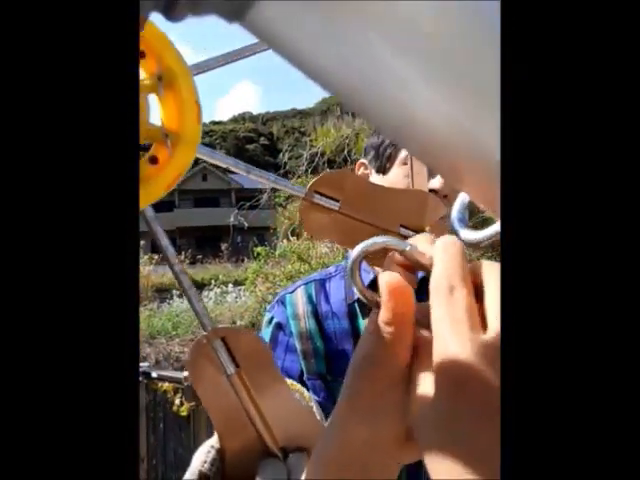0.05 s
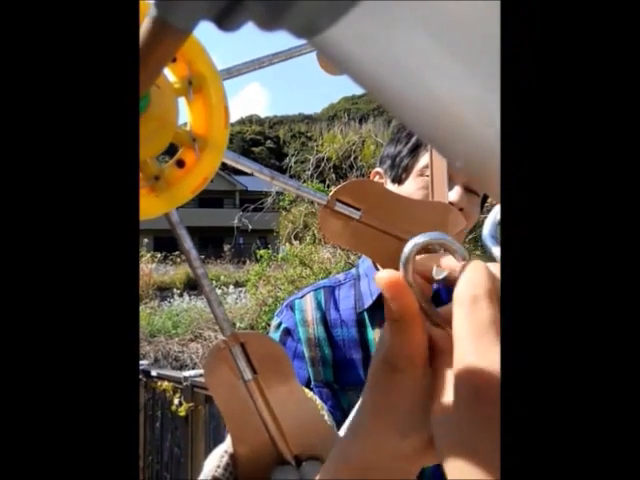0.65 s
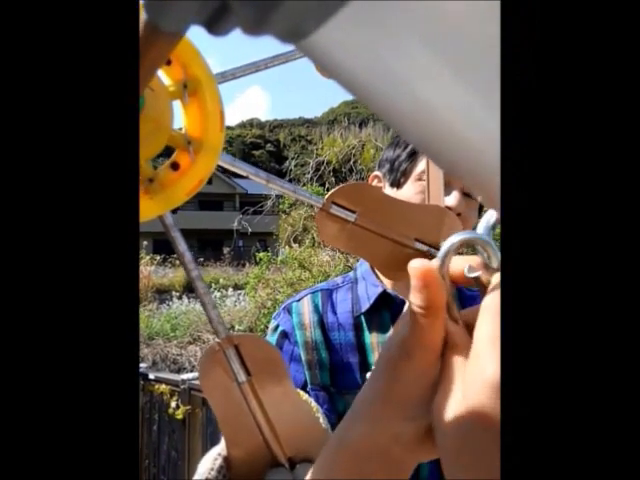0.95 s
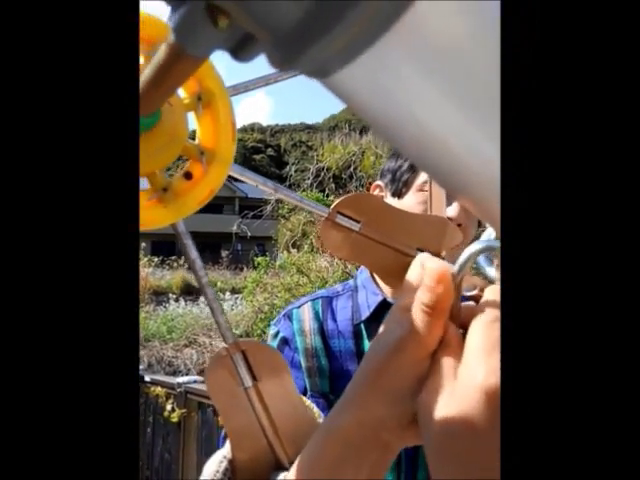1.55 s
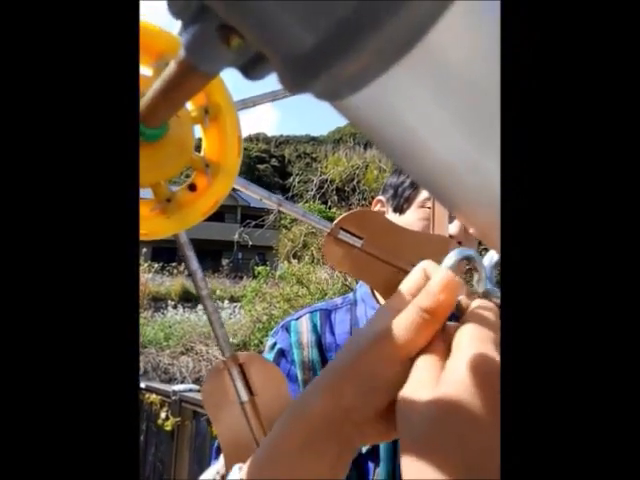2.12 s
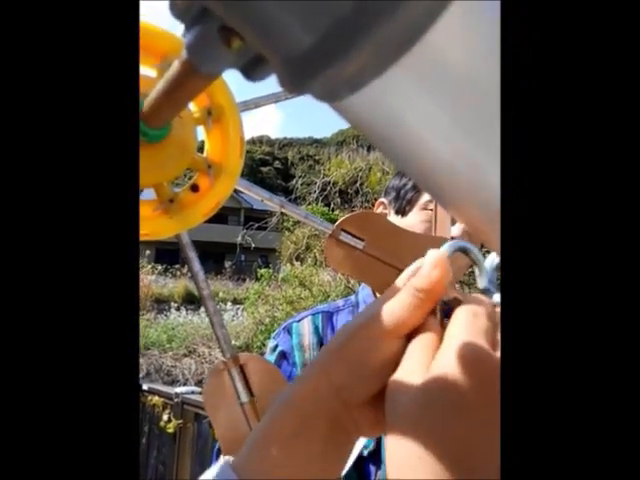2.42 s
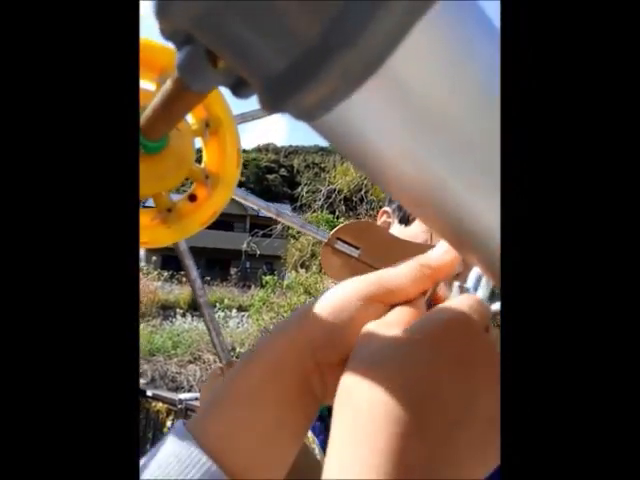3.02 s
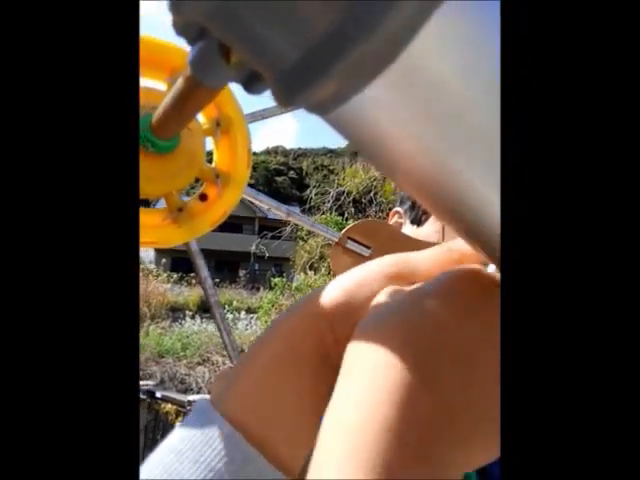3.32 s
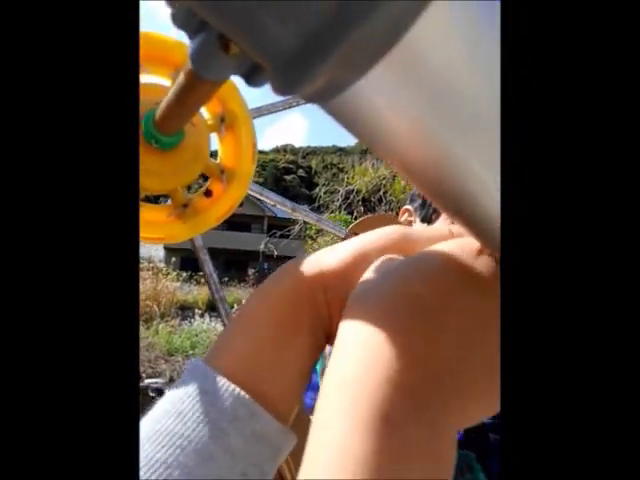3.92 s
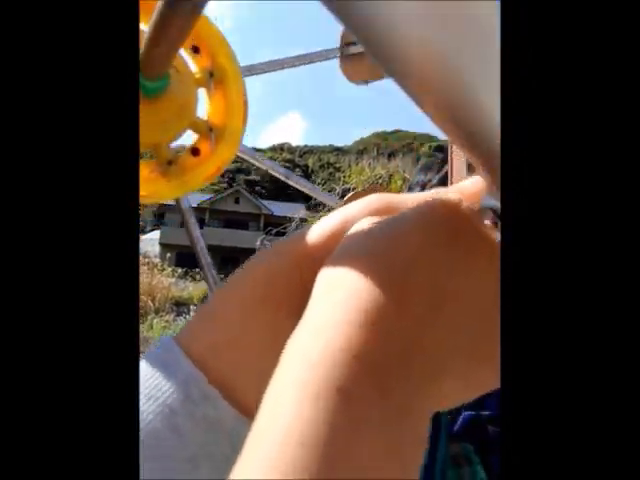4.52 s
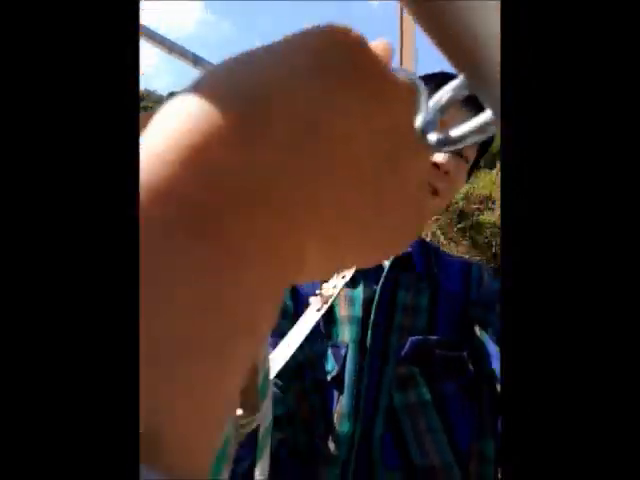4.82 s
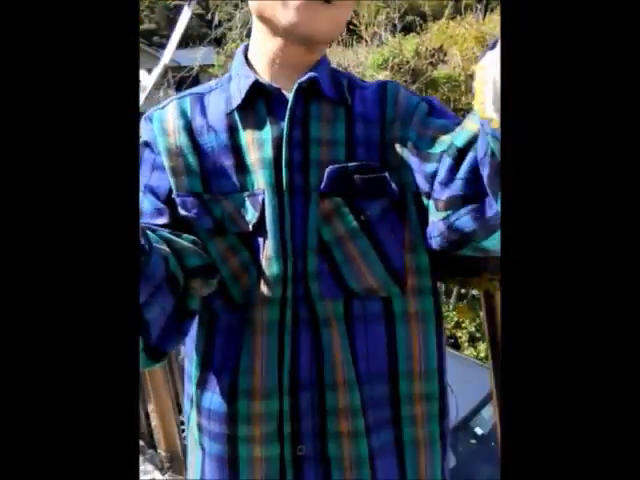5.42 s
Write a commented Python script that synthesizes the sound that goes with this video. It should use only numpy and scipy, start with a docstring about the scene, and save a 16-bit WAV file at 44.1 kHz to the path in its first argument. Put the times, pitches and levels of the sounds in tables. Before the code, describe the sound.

Outdoors and close to the microphone, a steel ring is worked into a fitting on a pole. It snaps three times, about two seconds apart, each a sharp, bright click with a very short ring. Between the snaps come faint ticks, thin squeaks, small scrapes and rustling sleeves. A soft low rumble of open air and a barely audible distant engine hum lie behind.

```python
"""A steel ring snapping into a fitting

Outdoors and close by, a steel ring is worked into a fitting on a pole. Stick-slip friction makes
it scrape and squeak under the fingers; three times it snaps home, and each impact excites the modes
of ring and fitting. Sleeves rustle, and the surroundings scatter a faint tail from the steel.
Behind it lie a low rumble of open air and the harmonic hum of a distant engine."""
import sys
import numpy as np
from scipy import signal
from scipy.io import wavfile

SR = 44100
rng = np.random.default_rng(int(sys.argv[2]) if len(sys.argv) > 2 else 0)


def wav_out(sig):
    """Save sig, one row per channel (or a flat mono array), as 16-bit PCM at SR to the path in sys.argv[1]."""
    wavfile.write(sys.argv[1], SR, np.round(np.clip(np.atleast_2d(sig).T, -1, 1) * 32767).astype(np.int16))


N = 249782
TIME = np.arange(N) / SR

# modes of the ring, the lowest from the pole it bears on: frequency_hz, level_db, t60_s
RING_MODES = [(660, -39, .2), (775, -36, .17), (835, -38, .2), (930, -36, .17), (1734, -34, .24),
              (2080, -25, .05), (3158, -16, .08), (3562, -29, .085), (3960, -25, .05), (4595, -15, .03),
              (4865, -13, .03), (5203, -18, .048), (5330, -22, .024), (6345, -20, .05), (6608, -7, .04),
              (6722, -24, .17), (6935, -13, .035), (7120, -16, .045), (7296, -3, .032), (7310, -24, .2),
              (7418, -30, .24), (8020, -21, .022), (8260, -20, .04), (8895, -11, .05), (9325, -13, .025)]
# modes of the fitting: frequency_hz, level_db, t60_s
FITTING_MODES = [(1610, -12, .03), (2257, -16, .037), (2775, -14, .025), (3100, -18, .045),
                 (3490, -15, .027), (4100, -10, .025), (4690, -9, .032), (5075, -12, .022),
                 (5750, -10, .075), (6180, -3, .02), (6530, -6, .036), (6990, 1, .03), (7300, -2, .024),
                 (7585, -7, .04), (8230, -8, .026), (8640, -14, .028), (9225, -15, .032)]

BAND_EDGES_HZ = np.r_[np.geomspace(10, 1500, 14), np.geomspace(1800, 17000, 18)]
BAND_HZ = np.sqrt(BAND_EDGES_HZ[:-1] * BAND_EDGES_HZ[1:])
BANDS = [signal.butter(2, edges, "band", fs=SR, output="sos")
         for edges in zip(BAND_EDGES_HZ, BAND_EDGES_HZ[1:])]


def from_db(db):
    """Amplitude grows tenfold for every 20 dB."""
    return 10 ** (np.asarray(db) / 20)


def rms_one(x):
    """Normalisation to unit mean power."""
    return x / np.sqrt(np.mean(x ** 2) + 1e-20)


def band_gains(spectrum):
    """Interpolation in log frequency gives a spectrum's gain at each band centre."""
    hz, db = np.transpose(spectrum)
    return from_db(np.interp(np.log(BAND_HZ), np.log(hz), db))


def drift(rate_hz):
    """Random modulation: straight lines join Gaussian values drawn at the given rate."""
    knots = rng.standard_normal(4096)
    return np.interp(TIME * rate_hz, np.arange(len(knots)), knots)


def coloured(spectrum, flicker_db=0, steady_hz=1500):
    """Spectral shaping: noise bands sum to unit rms; any flicker is deepest in the lows."""
    white = rng.standard_normal((2, N))
    depth_db = flicker_db / (1 + BAND_HZ / steady_hz)
    bands = (gain * signal.sosfilt(BANDS[k], white[k % 2]) * from_db(depth_db[k] * drift(12))
             for k, gain in enumerate(band_gains(spectrum)))
    return rms_one(sum(bands))


def stroke(peak_s, db, rise_s, fall_s, drop_db=14.5, roundness=1.53):
    """Amplitude envelope of a hand stroke, drop_db down at one rise or fall time from its peak."""
    distance = np.maximum((peak_s - TIME) / rise_s, (TIME - peak_s) / fall_s)
    return from_db(db - drop_db * np.minimum(distance, 10) ** roundness)


def strokes(rows):
    """Incoherent addition: the powers of the strokes sum."""
    return np.sqrt(sum(stroke(*row) ** 2 for row in rows))


def resonate(force, modes):
    """Modal superposition: each mode answers the force as a damped oscillator."""
    out = 0
    for k, (hz, db, t60_s) in enumerate(modes):
        radius = np.exp(-np.log(1000) / (t60_s * SR))
        angle = 2 * np.pi * hz / SR
        poles = [1, -2 * radius * np.cos(angle), radius * radius]
        out += (-1) ** k * from_db(db) * signal.lfilter([0, np.sin(angle)], poles, force + 1e-18)
    return out


def scrape(pushes, modes, slips_per_s, grit_db, tilt_db_per_octave, uneven_db=3, stick_db=-77):
    """Friction excitation: tiny uneven slips ring the modes and add a dry grit."""
    # grit of sliding steel: frequency_hz, density_db
    grit_spectrum = [(400, -14), (800, -2), (1300, -34), (2150, 2.5), (2700, -13), (3500, 2.5), (4300, -14),
                     (6000, -7), (7200, -8), (9100, -4), (10300, -25), (15000, -24)]
    level = np.maximum(strokes(pushes) - from_db(stick_db), 0)  # too light a push sticks, silent
    grip = from_db(uneven_db * drift(220))
    slips = (rng.random(N) < slips_per_s / SR) * rng.choice([-1, 1], N) * grip
    # rubbing is softer than a blow, so it favours the low modes
    top_hz = modes[-1][0]
    softened = [(hz, db + tilt_db_per_octave * np.log2(top_hz / max(hz, 2000)), t60_s)
                for hz, db, t60_s in modes]
    grit = from_db(grit_db) * coloured(grit_spectrum) * grip
    return level * (rms_one(resonate(slips, softened)) + grit)


def open_air(level_db=-53.5):
    """Ambient noise: open air rumbles with a spectrum weighted to the flickering lows."""
    # rumble of the air: frequency_hz, density_db
    spectrum = [(10, 2.5), (25, -1), (60, -3.5), (90, -6.5), (130, -14), (200, -15.5), (400, -23),
                (800, -27.5), (1500, -32), (3000, -34.5), (5500, -37), (7200, -32.5), (11000, -36),
                (15500, -39)]
    return from_db(level_db) * coloured(spectrum, flicker_db=2.5)


def distant_engine(fundamental_hz=67.56, waver=0.0031, swell_db=11.5, flutter_db=1):
    """Harmonic series: three orders of the far engine carry, each swelling in its own time."""
    # engine orders: order, peak_db, peak_s, half_length_s
    orders = [(3, -69.5, 1.3, 2.2), (4, -67.5, 2.7, 1.84), (5, -71, 1.05, 2.7)]
    cycles = np.cumsum(fundamental_hz * (1 + waver * drift(3.01))) / SR
    out = 0
    for order, peak_db, peak_s, half_length_s in orders:
        sunk_db = swell_db * (1 - np.exp(-((TIME - peak_s) / half_length_s) ** 2))
        level = from_db(peak_db - sunk_db + flutter_db * drift(5))
        out += level * np.sqrt(2) * np.sin(2 * np.pi * round(order) * cycles)
    return out


def scattering(sound, wet_db=-24, t60_s=0.2, build_s=0.014):
    """Diffuse reflection: pole, deck and bodies return a short, faint tail."""
    # scattered sound: frequency_hz, density_db
    spectrum = [(250, -4), (750, 8), (1200, 2), (1750, 5), (2300, -5), (3200, -9), (4800, -12), (5700, -7),
                (6900, -1), (9000, -6), (11000, -22), (15000, -26)]
    t = TIME[:SR // 2]
    envelope = np.exp(-np.log(1000) * t / t60_s) * (1 - np.exp(-t / build_s))
    response = coloured(spectrum)[:len(t)] * envelope
    return from_db(wet_db) * signal.fftconvolve(sound, response / np.linalg.norm(response))[:N]


def sleeves(rest_db=-75.5):
    """Friction noise: brushing cloth hisses with each stroke and is never quite still."""
    # brushes of the sleeves: peak_s, level_db, rise_s, fall_s
    brushes = [(1.66, -65.5, .18, .2), (2.9, -67, .25, .4), (3.19, -58, 0.21, 0.16),
               (3.42, -63.5, 0.11, .2), (3.62, -58.5, 0.12, .13), (4.2, -68, .15, 0.11),
               (4.56, -65.5, 0.3, 0.35), (5.16, -56.5, 0.24, 0.11), (5.315, -52.5, 0.065, 0.071),
               (5.58, -55.5, 0.24, 0.25)]
    # rustle of cloth: frequency_hz, density_db
    spectrum = [(500, 0.5), (1200, -6), (2300, -11), (4000, -6), (5500, -2), (7000, 5), (8300, 1.5),
                (10500, -23), (15000, -25)]
    level = np.hypot(strokes(brushes), from_db(rest_db))
    return level * from_db(drift(60)) * coloured(spectrum)


def grip_chafe():
    """Heavy damping: the grip's dense slips drive short-lived modes, soft and hollow."""
    # pushes of the grip: peak_s, level_db, rise_s, fall_s
    pushes = [(2.79, -64.5, .08, 0.073), (3.2, -63.5, .06, .08), (3.315, -59, 0.085, 0.084),
              (3.61, -63, 0.14, 0.13), (5.44, -62.5, 0.06, .06)]
    # hollow resonances: frequency_hz, level_db, t60_s
    modes = [(545, -5, .02), (2010, -4.5, 0.019), (2240, -2.5, .014)]
    return scrape(pushes, modes, slips_per_s=3300, grit_db=-23, tilt_db_per_octave=6)


def ring_drag():
    """Sliding friction excites the ring's modes as it is dragged through the fitting."""
    # drags of the ring: peak_s, level_db, rise_s, fall_s
    pushes = [(1.68, -66, 0.31, 0.28), (2.04, -51, 0.049, 0.095), (2.105, -60, .025, .03)]
    return scrape(pushes, RING_MODES, slips_per_s=1200, grit_db=-1.5, tilt_db_per_octave=4)


def fitting_rub():
    """Sliding friction excites the fitting's modes as the ring turns against it."""
    # turns of the ring: peak_s, level_db, rise_s, fall_s
    pushes = [(3.61, -57, 0.062, .1), (5.088, -48, .018, .022), (5.135, -43.5, 0.042, 0.026)]
    return scrape(pushes, FITTING_MODES, slips_per_s=1300, grit_db=-7.5, tilt_db_per_octave=4.5)


def ring_squeal():
    """Resonance: the slipping ring sings in a few modes."""
    # push on the ring: peak_s, level_db, rise_s, fall_s
    pushes = [(5.07, -48.5, 0.12, 0.074)]
    # singing resonances: frequency_hz, level_db, t60_s
    modes = [(2210, -15.5, 0.054), (4600, -6, 0.012), (6370, -5, 0.018), (6970, -1, 0.025),
             (7350, -7, 0.02)]
    return scrape(pushes, modes, slips_per_s=630, grit_db=-16, tilt_db_per_octave=1)


def squeaks(waver_hz=95, flutter_db=4, sag_octaves_per_s2=15):
    """Stick-slip oscillation sings a thin, raspy tone whose pitch arches with the stroke."""
    # slips of steel: peak_s, level_db, rise_s, fall_s, pitch_hz, glide_octaves_per_s
    slips = [(1.6, -71, .15, .09, 6150, 0.5), (1.665, -63.5, 0.041, 0.032, 8470, 0),
             (1.675, -74, 0.045, .045, 6900, -3), (1.665, -70, 0.054, .05, 4730, -2),
             (1.72, -73, .06, 0.16, 2980, 0.5), (1.985, -63.5, .03, 0.046, 5950, -7),
             (2.07, -65, 0.087, 0.038, 5585, 1), (3.63, -62.5, .08, 0.1, 9130, -0.5),
             (4.31, -59.5, 0.011, 0.018, 2380, 4.5), (5.2, -65.5, .04, 0.1, 2490, -1)]
    wavering_hz = waver_hz * drift(700)
    out = np.zeros(N)
    for peak_s, db, rise_s, fall_s, pitch_hz, glide in slips:
        t = TIME - peak_s
        hz = pitch_hz * 2 ** (glide * t - sag_octaves_per_s2 * t ** 2)
        phase = 2 * np.pi * np.cumsum(hz + wavering_hz) / SR
        out += stroke(peak_s, db, rise_s, fall_s) * np.sqrt(2) * np.sin(phase)
    return out * from_db(flutter_db * drift(120))


def rattle(count, size, rate_hz=60):
    """Narrowband modulation: complex noise of unit spread wobbles each mode's level and phase."""
    white = rng.standard_normal((count, size + SR // 10, 2)) @ [1, 1j]
    slow = signal.lfilter(*signal.butter(2, rate_hz, fs=SR), white)[:, -size:]
    return slow / np.std(slow)


def ringing(modes, driven_s, rise_s=0.00078, loose_s=0.053):
    """Forced, then free vibration: chatter sustains the modes, which fade unevenly as parts settle."""
    t = TIME[:SR // 3]
    hz, db, t60_s = np.transpose(modes)[:, :, None]
    attack = (1 - np.exp(-t / rise_s)) ** 2
    level = from_db(db - 60 * np.maximum(t - driven_s, 0) / t60_s)
    pure = np.exp(-(t / loose_s) ** 2)
    wobble = pure + np.sqrt(1 - pure ** 2) * rattle(len(modes), len(t))
    phase = 2 * np.pi * (hz * t + rng.random(hz.shape))
    tones = np.imag(wobble * np.exp(1j * phase))
    return attack * np.sum(level * tones, axis=0)


def crack(contact_s, lows_db, mids_db, fade_s=0.0029, linger_db=-29, linger_s=0.048, size=6144):
    """Modal overlap: chattering steel's dense, hand-damped modes merge in a burst with a faint tail."""
    # crack of a contact: frequency_hz, density_db
    spectrum = [(300, -31), (750, -24), (1300, -26), (2000, -18.5), (2700, -16.5), (3700, -9), (4800, 0.5),
                (5800, -16), (7000, 8), (9000, -5), (10500, -43), (14500, -24)]
    t = np.arange(size) / SR
    chatter = np.exp(-np.maximum(t - contact_s, 0) / fade_s)
    envelope = chatter + from_db(linger_db) * np.exp(-t / linger_s)
    gains = band_gains(spectrum) * np.sqrt(np.diff(BAND_EDGES_HZ))  # power grows with bandwidth
    colour = from_db(np.interp(BAND_HZ, [2510, 3560, 4940, 5950], [lows_db, mids_db, mids_db, 0]))
    weights = colour * gains / np.linalg.norm(gains)
    bands = [rms_one(signal.sosfilt(sos, envelope * rng.standard_normal(size))) for sos in BANDS]
    return weights @ np.array(bands) * np.sqrt(np.mean(envelope ** 2))


def clicks(crack_db=-3, modes_db=-3, driven_share=0.96):
    """Impact excitation: each contact cracks and sets ring and fitting vibrating."""
    # steel on steel, three loud snaps among light ticks, levels relative:
    # start_s, level_db, contact_s, lows_db, mids_db, ring_db, fitting_db
    contacts = [(0.548, -61, 0.0025, 25.5, 4, -15, -3), (0.621, -62, .002, 6, 14, -15, -11),
                (1.0355, -18, 0.0042, 6, 1.5, 6.5, -10), (2.023, -44.5, 0.0033, -5, -3, -4, -14),
                (2.034, -43.5, .0031, 6, 3, 2, -17), (2.414, -61.5, .0017, 2, 10, -15, -12),
                (2.525, -61, 0.0038, 35.5, 8, -7, -12), (3.0715, -24.5, 0.0013, 14.5, 8.5, 4, -5),
                (5.132, -43.5, .010, 11, 9.5, -20, -7), (5.158, -39.5, 0.003, 11, -4, -15, -10),
                (5.2685, -23, 0.0019, -4, 0, -8, -1), (5.356, -52.5, 0.0057, 19, 1, -15, 1.5)]
    out = np.zeros(N + SR)
    for start_s, db, contact_s, lows_db, mids_db, ring_db, fitting_db in contacts:
        start = round(start_s * SR)
        burst = crack(contact_s, lows_db, mids_db)
        out[start:start + len(burst)] += from_db(db + crack_db) * burst
        driven_s = driven_share * contact_s
        ring = from_db(ring_db) * ringing(RING_MODES, driven_s)
        fitting = from_db(fitting_db) * ringing(FITTING_MODES, driven_s)
        out[start:start + len(ring)] += from_db(db + modes_db) * (ring + fitting)
    return out[:N]


def scene():
    """Superposition: steel, grip and sleeves close by, air and engine far off, in one channel."""
    steel = clicks() + squeaks() + ring_drag() + fitting_rub() + ring_squeal()
    return (steel + grip_chafe() + sleeves() + open_air() + scattering(steel) + distant_engine())[None]


def record(dry, cutoff_hz=15720):
    """Band limiting: an elliptic low-pass cuts the top steeply."""
    return signal.sosfilt(signal.ellip(12, .1, 80, cutoff_hz, fs=SR, output="sos"), dry)


dry = scene()
out = record(dry)
wav_out(out)
```